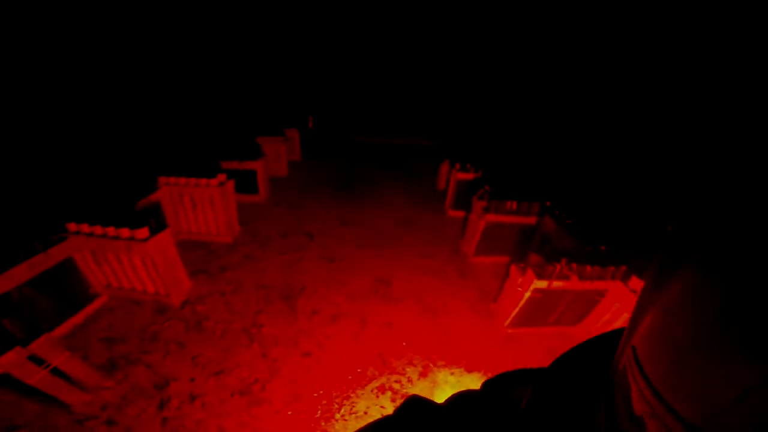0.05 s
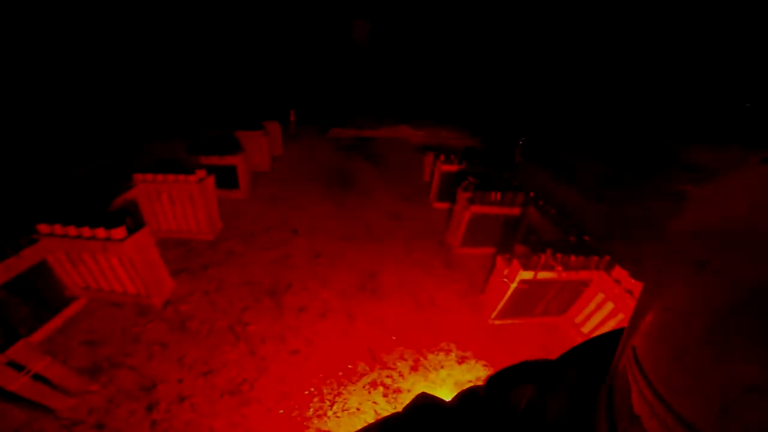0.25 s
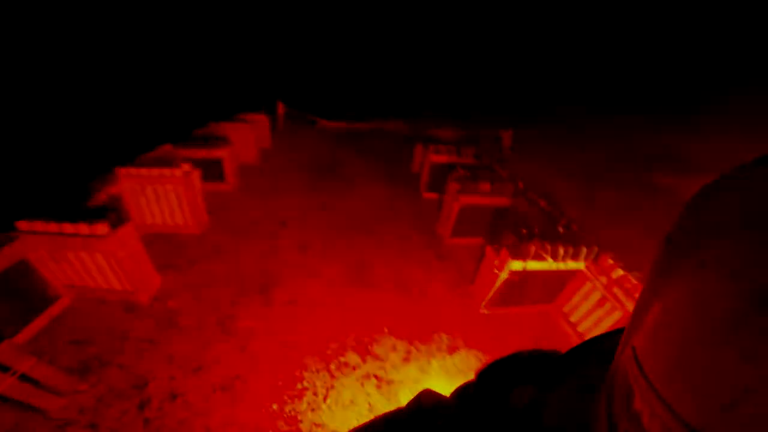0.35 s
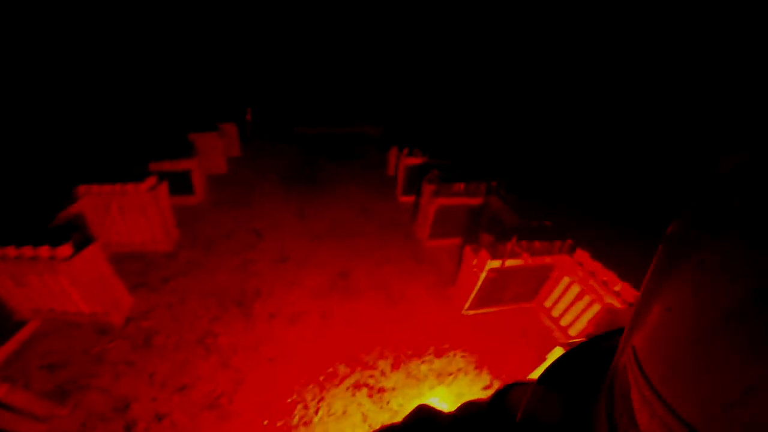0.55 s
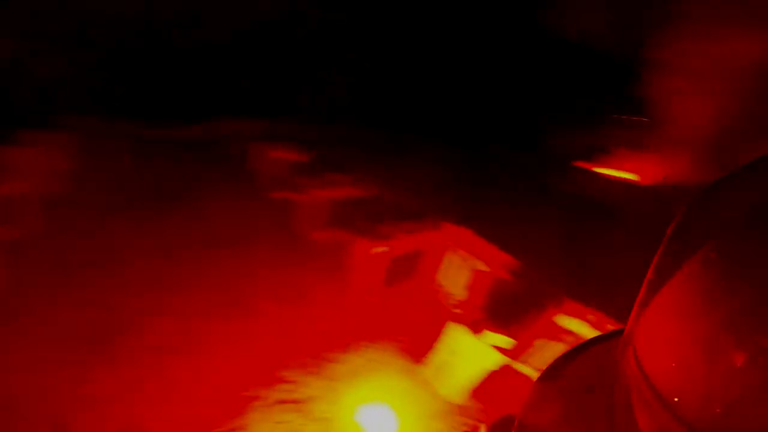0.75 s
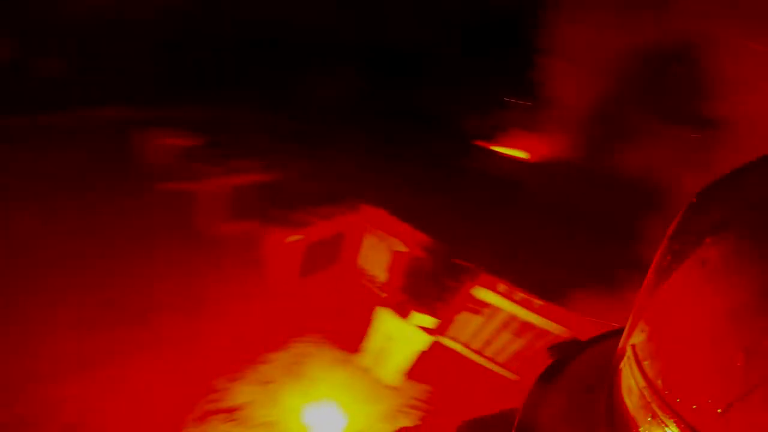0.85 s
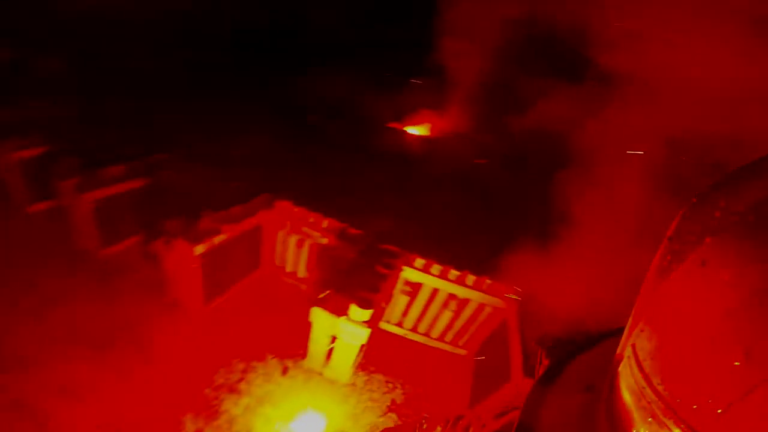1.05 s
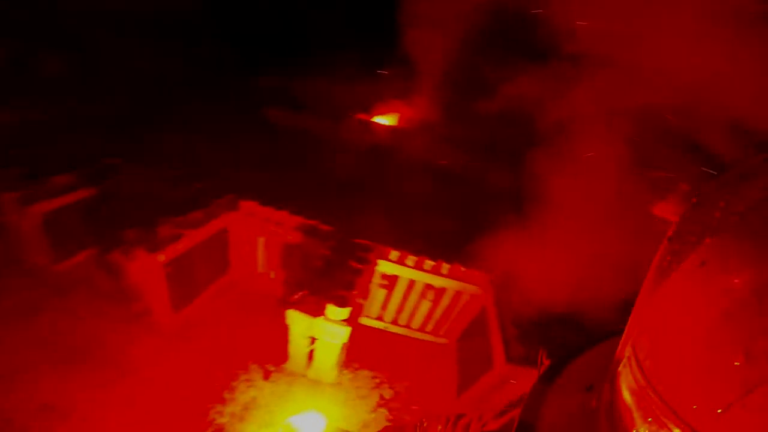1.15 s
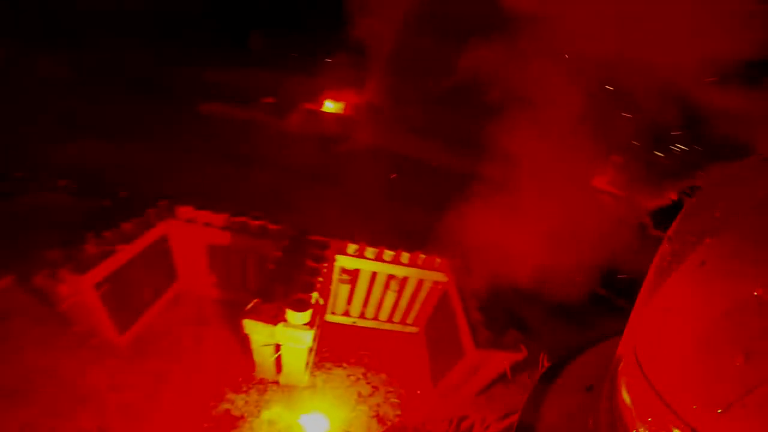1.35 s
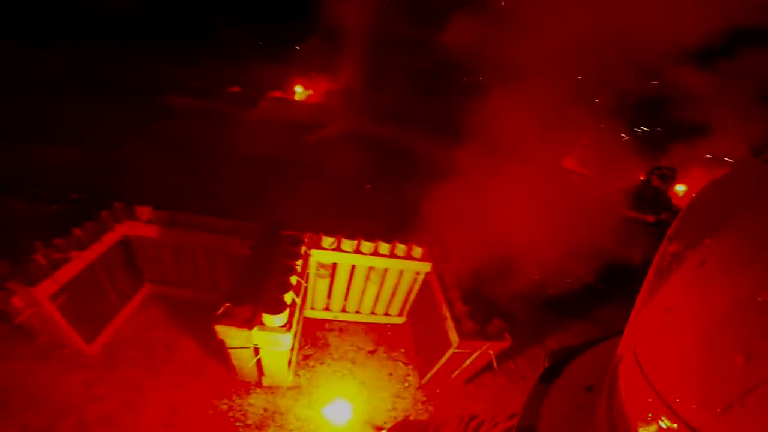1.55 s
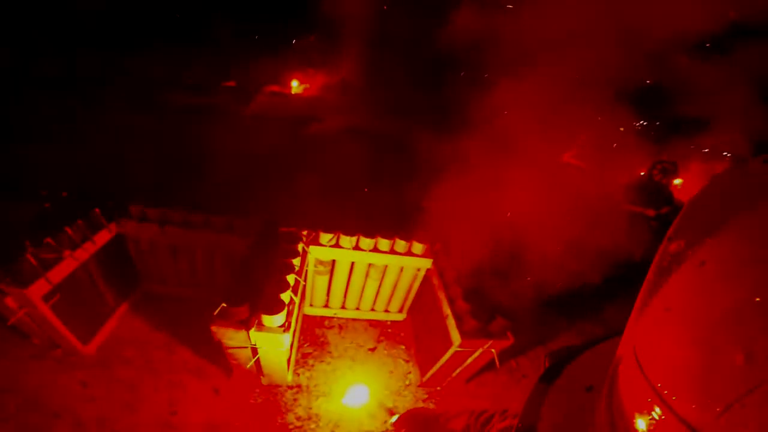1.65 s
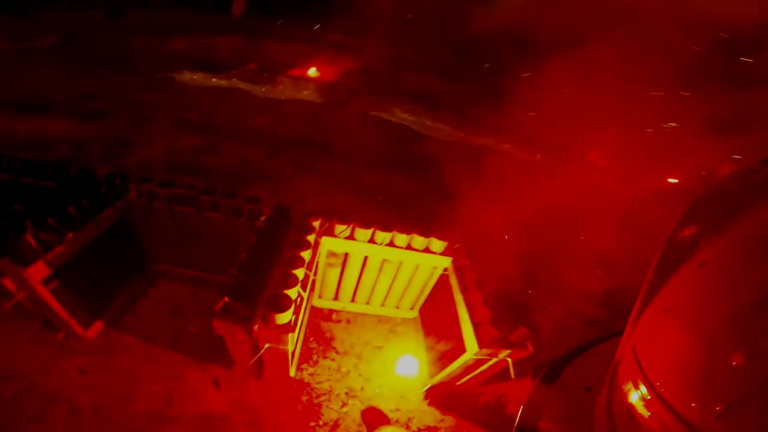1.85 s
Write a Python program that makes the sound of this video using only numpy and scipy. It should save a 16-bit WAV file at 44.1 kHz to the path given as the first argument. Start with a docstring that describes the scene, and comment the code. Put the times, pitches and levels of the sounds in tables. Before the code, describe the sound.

Firework mortar shots outdoors, very close to a microphone in a closed case. Soft far pops at 0.06 and 0.16-0.2 seconds; a dense, clipped volley of cracks and hollow tube thumps at 0.25-0.32; a double bang at 0.48. Muffled distant bangs follow at 0.5-0.63. Echoing roar fades over faint flare hiss, rumble and wind, with a barely audible high squeak at 1.23 and faint far thud at 1.5.

```python
"""A field at night: mortar shells go off, a cluster of near lift charges, a double bang and a few far ones.
Near fronts are pressure pulses with scattered copies, filtered by the closed case around the microphone.
Low pushes ring the mortar tubes, noise bursts make the spray and the far bangs, random taps the echoes.
Shaped noise forms the field's roar, the hiss of a burning flare, rumble and wind; a faint squeak glides up.
The input stage overloads on the loudest peaks."""
import sys
import numpy as np
from scipy import signal
from scipy.io import wavfile
from scipy.ndimage import uniform_filter1d

SR = 44100
rng = np.random.default_rng(int(sys.argv[2]) if len(sys.argv) > 2 else 0)


def gain_from_db(level_db):
    """Turn a decibel level (scalar or array-like) into a linear amplitude factor."""
    decades = np.asarray(level_db, float) / 20
    return 10 ** decades


def int16_out(signal):
    """Quantize to a 16-bit WAV file."""
    q = np.round(np.clip(np.atleast_2d(signal).T, -1, 1) * 32767)
    wavfile.write(sys.argv[1], SR, q.astype(np.int16))


N = 85995

# near blast fronts: start_s, peak_db (of the front behind the case wall), front_length_s,
# scatter_db (before division by 4), scatter_t60_s
NEAR_FRONTS = [(.2435, -42, .0003, 6, .1), (.2475, -30, .0002, 0, .04), (.2490, -2, .00007, -12, .02),
               (.2515, -10, .0002, -2, .06), (.2583, -8, .0001, -8, .04), (.2617, -3, .0002, -8, .03),
               (.2601, -9, .0001, -6, .03), (.2652, -8, .00015, -8, .03), (.2677, -10, .0001, -10, .04),
               (.2745, -14, .0001, 0, .03), (.2762, -4, .0001, -6, .02), (.2797, -11, .0002, -8, .04),
               (.3040, -24, .0004, 4, .06), (.3092, -7, .0006, -10, .03), (.3111, -3, .0002, -10, .03),
               (.3132, -4, .0005, -8, .03), (.3149, -3, .0004, -10, .03), (.3174, -5, .00025, -8, .02),
               (.3186, -7, .0004, -12, .025), (.4832, -9, .0001, -20, .02), (.4836, -4, .00008, -18, .025),
               (.4941, -13, .00012, -14, .025)]
# onsets of the low pushes: start_s
PUSH_STARTS = [.1625, .2485, .2775, .3092, .3157, .4832, .4939]
# low pushes that ring a tube, one row per onset: push_db (before doubling), push_length_s,
# ring_db (before halving), pitch_factor; both parts are low-passed afterwards
PUSHES = [(-56, .002, -32.5, .8), (-44, .001, -18, 1.33), (-54, 0.00081, -11.5, 1.014),
          (-12.5, 0.00051, -21, 1.4), (3, 0.0007, -7, 1.044), (-6.5, 0.00054, -11.5, 1.058),
          (-11.5, 0.00097, -13, .98)]
# mortar tube modes: pitch_hz (before the pitch factor), level_db (before the ring level), t60_s
TUBE_MODES = [(109, -20, 0.174), (206.7, 2, .06), (265, -5, .05), (384, -6, .04)]
# air modes of the case, relative to the direct sound: pitch_hz, level_db, t60_s
CASE_MODES = [(1070, -27.5, 0.017), (1626, -22, .015), (2810, -11, 0.0073), (3673, -23.5, 0.018),
              (4880, -12, 0.0059), (6100, -2.5, 0.0059), (8940, -24, 0.0028)]
# relative transmission through the case wall: frequency_hz, gain_db
CASE_WALL = [(100, -34), (300, -2), (500, -7.5), (1000, -5), (3300, 0), (4000, -5), (6500, -15.5),
             (7500, -17), (10000, 9.5), (13000, -27), (15000, -42), (16500, -87)]
# relative spectrum of the bright spray of burning gas: frequency_hz, gain_db
SPRAY_COLOUR = [(3820, -23), (6500, -2.5), (6800, -8.5), (8090, -13), (8790, -10), (9660, -19),
                (13400, -28), (14600, -26), (16000, -38)]
# decay of the answer from racks and ground: frequency_hz, t60_s
ECHO_DECAY = [(100, 0.37), (400, 0.17), (1500, 0.11), (4000, 0.3), (12000, 0.45)]
# far bangs, smeared by distance: start_s, level_db (before halving), rise_s, t60_s
FAR_BANGS = [(0.0617, -29, 0.00069, 0.031), (0.0644, -34.5, 0.0024, 0.028), (0.164, -30.5, .001, 0.061),
             (0.174, -29.5, 0.0016, 0.092), (0.179, -53, 0.0017, 0.058), (.199, -40, 0.0021, 0.059),
             (0.501, -27, .003, 0.033), (0.512, -29.5, 0.0026, 0.097), (0.545, -29.5, 0.0032, 0.1),
             (.557, -31.5, 0.0023, 0.058), (.630, -38.5, .003, 0.036), (1.497, -45, 0.0059, 0.4)]
# relative spectrum of the far bangs after air and case: frequency_hz, gain_db
FAR_BANG_COLOUR = [(180, -42), (300, 0), (486, -16), (1050, -13), (1280, -9.5), (1570, -2), (2130, -13.5),
                   (2720, -8), (3990, -28.5), (4540, -14), (5170, -23.5), (5970, -15), (6680, -27),
                   (7600, -25), (14000, -52)]
# thin rising squeak: start_s, length_s, from_hz, to_hz
SQUEAK_GLIDE = (1.232, .055, 9900, 10250)
# lingering roar of the field, level of its 1000-3500 Hz band: time_s, level_db
ROAR_LEVEL = [(0.0, -53.5), (0.26, -57), (0.368, -49.5), (0.802, -51.5), (0.966, -54.5), (1.232, -57),
              (1.602, -59.5), (1.786, -60), (1.95, -64.5)]
# relative spectrum of the roar: frequency_hz, gain_db
ROAR_COLOUR = [(180, -52), (300, -12), (364, -16), (407, -2), (448, -11), (478, -8.5), (681, -6),
               (1070, -6.5), (1180, -3.5), (1300, -10.5), (1570, 1), (2170, -10.5), (2590, 2), (3290, -14),
               (4690, -11.5), (5170, -23), (5970, -10), (7970, -32.5), (14000, -41)]
# flare hiss, level of its treble band: time_s, level_db
FLARE_LEVEL = [(0.0, -67.5), (0.286, -87.5), (0.4, -70.5), (0.678, -77), (0.95, -84.5), (1.216, -82),
               (1.492, -75), (1.656, -75), (1.95, -76.5)]
# relative spectrum of the flare: frequency_hz, gain_db
FLARE_SPECTRUM = [(180, -21), (300, 4), (500, -11.5), (543, -11), (610, -3.5), (1140, -11), (1460, -3.5),
                  (1590, -10), (2880, -13.5), (4140, -13), (5390, -19), (13100, -32.5), (15500, -54)]
# treble band to which the flare level refers: low_hz, high_hz
FLARE_TREBLE = (8000, 13000)
# distant low rumble, in two stretches: time_s, level_db
RUMBLE_LEVEL = [
    [(0.0, -51), (0.07, -51.5), (0.112, -56), (0.126, -64), (0.14, -74), (0.15, -53.5)],
    [(0.6, -53.5), (0.686, -52.5), (0.768, -59), (0.802, -50.5), (0.858, -58), (0.934, -52), (0.96, -58.5),
     (1.016, -46.5), (1.058, -58), (1.302, -45.5), (1.324, -49.5), (1.528, -49), (1.558, -53.5),
     (1.84, -56), (1.854, -55), (1.95, -59)],
]
# relative spectrum of the rumble: frequency_hz, gain_db
RUMBLE_SPECTRUM = [(29, -36), (50, -20.5), (76, -3), (160, 0), (258, -7), (328, -21.5), (498, -19),
                   (564, -23), (600, -23), (780, -57), (1320, -120)]
# gusts on the case, in two stretches: time_s, level_db
WIND_LEVEL = [
    [(0.0, -51.5), (0.066, -49), (0.084, -46), (0.164, -44.5), (0.194, -51), (0.224, -53), (0.28, -49)],
    [(0.36, -56), (0.43, -58), (0.466, -64), (0.59, -78), (0.678, -48.5), (0.856, -55), (0.98, -45.5),
     (1.086, -57.5), (1.138, -49.5), (1.204, -53.5), (1.678, -46.5), (1.736, -46.5), (1.762, -43.5),
     (1.922, -44), (1.95, -47)],
]
# relative spectrum of the wind: frequency_hz, gain_db
WIND_SPECTRUM = [(4.7, -35), (8.0, 1), (27, 8), (40, 1.5), (54, -27.5), (90, -7.5), (120, -31), (200, -120)]

SCATTER_RISE_S = .0005  # onset of scattered copies and of the spray


def near_fronts():
    """Scattering: a sharp front is followed by a decaying train of random copies, all behind the case wall."""
    out = np.zeros(N)
    grit = rng.standard_normal((len(NEAR_FRONTS), 8192))
    t = np.arange(8192) / SR
    for (start_s, peak_db, length_s, scatter_db, t60_s), draws in zip(NEAR_FRONTS, grit):
        pulse = front(t, length_s)
        decay = gain_from_db(scatter_db - 60 * t / t60_s) * np.minimum(t / SCATTER_RISE_S, 1)
        scatter = signal.oaconvolve(decay * draws / 4, pulse[:256])[:len(t)]
        front_peak = abs(housing(pulse)).max()
        add(out, start_s, gain_from_db(peak_db) * housing(pulse + scatter) / front_peak)
    return out


def lift_pushes():
    """Resonance: the low push of a lift charge sets the air column of its tube ringing."""
    ring_rise_s, ring_low_cut_hz, dull_hz = 0.00056, 173, 2600
    out, t = np.zeros(N), np.arange(8192) / SR
    low_cut = signal.butter(1, ring_low_cut_hz, "high", fs=SR)
    dulling = signal.butter(2, dull_hz, fs=SR)
    for start_s, (push_db, length_s, ring_db, pitch_factor) in zip(PUSH_STARTS, PUSHES):
        ring = gain_from_db(ring_db) * np.minimum(t / ring_rise_s, 1) * ringing(TUBE_MODES, t, pitch_factor) / 2
        push = gain_from_db(push_db) * 2 * front(t, length_s)
        thump = push - signal.lfilter(*low_cut, ring)
        add(out, start_s, signal.lfilter(*dulling, thump))
    return out


def front(t, length_s):
    """Blast wave: a pressure jump and the suction after it, as the microphone's inverted polarity shows it."""
    u = t / length_s
    return -(1 - u) * np.exp(-u) * np.minimum(u * 4, 1)


def ringing(modes, t, pitch_factor=1):
    """Modal superposition: each mode is an exponentially decaying sine."""
    return sum(gain_from_db(level_db - 60 * t / t60_s) * np.sin(2 * np.pi * pitch_hz * pitch_factor * t)
               for pitch_hz, level_db, t60_s in modes)


def housing(x):
    """Transmission and resonance: the case wall colours the sound and its air modes ring."""
    t = np.arange(2048) / SR
    direct_and_modes = (t == 0) + ringing(CASE_MODES, t)
    inside = signal.oaconvolve(x, direct_and_modes)
    return signal.oaconvolve(inside, causal(CASE_WALL))[:len(x)]


def gas_spray():
    """Turbulent noise: the powers of short bright sprays add, one per front, each with a faint long tail."""
    burst_db, burst_t60_s = -20, 0.0097  # level relative to the front's peak
    tail_db, tail_t60_s = -47.5, 0.32
    power, t = np.zeros(N), np.arange(16384) / SR
    # doubled decibels turn amplitude into power
    decay = gain_from_db(2 * (burst_db - 60 * t / burst_t60_s)) + gain_from_db(2 * (tail_db - 60 * t / tail_t60_s))
    rise = np.minimum(t / SCATTER_RISE_S, 1)
    for start_s, peak_db, *_ in NEAR_FRONTS:
        add(power, start_s, gain_from_db(2 * peak_db) * rise * decay)
    spray = np.sqrt(power) * rng.standard_normal(N)
    return signal.oaconvolve(spray, causal(SPRAY_COLOUR))[:N]


def echoes(x):
    """Reverberation: sparse reflections of random sign, each band dying at its own speed."""
    echo_db = -14.5  # energy of the whole response
    taps = np.zeros(SR // 2)
    slots = np.arange(300, len(taps) - 20, 20)  # one reflection in every 20 samples
    taps[slots + rng.integers(0, 20, len(slots))] = rng.choice([-1., 1.], len(slots))
    hz, t, spectra = signal.stft(taps, SR, nperseg=256)
    decay = gain_from_db(-60 * t / read(ECHO_DECAY, hz)[:, None])
    response = signal.istft(spectra * decay, SR, nperseg=256)[1]
    return gain_from_db(echo_db) * signal.fftconvolve(x, response / np.linalg.norm(response))[:N]


def far_bangs():
    """Propagation loss: a distant charge has no clean front, only a coloured noise burst."""
    out = np.zeros(N)
    grit = rng.standard_normal((len(FAR_BANGS), 8192))
    t = np.arange(8192) / SR
    for (start_s, level_db, rise_s, t60_s), draws in zip(FAR_BANGS, grit):
        body = signal.oaconvolve(draws, causal(FAR_BANG_COLOUR))[:len(t)] / 2
        envelope = gain_from_db(level_db - 60 * t / t60_s) * np.minimum(t / rise_s, 1)
        add(out, start_s, envelope * body)
    return out


def squeak():
    """Frequency glide: the phase of a faint tone is the running sum of its rising frequency."""
    peak_db = -75
    start_s, length_s, from_hz, to_hz = SQUEAK_GLIDE
    t, out = np.arange(0, length_s, 1 / SR), np.zeros(N)
    pitch_hz = from_hz + (to_hz - from_hz) * t / length_s
    tone = np.sin(2 * np.pi * np.cumsum(pitch_hz) / SR)
    add(out, start_s, gain_from_db(peak_db) * tone * np.sin(np.pi * t / length_s) ** .5)
    return out


def field_roar():
    """Diffuse field: the lingering echo of the field is heard as patchy coloured noise."""
    return noise(ROAR_COLOUR, ROAR_LEVEL, patchy_db=2.5, flicker_db=0.7, band=(1000, 3500))


def flare_hiss():
    """Combustion noise: the burning flare is a random hiss whose level is set in its treble."""
    return noise(FLARE_SPECTRUM, FLARE_LEVEL, patchy_db=-0.7, flicker_db=-1.0, band=FLARE_TREBLE)


def low_rumble():
    """Low-pass noise: the distant rumble keeps only low frequencies and wanders in level."""
    return noise(RUMBLE_SPECTRUM, sum(map(list, RUMBLE_LEVEL), []), patchy_db=3.5, flicker_db=-1.8, size=2048)


def wind():
    """Flow noise: gusts on the case are very low random pressure changes."""
    return noise(WIND_SPECTRUM, sum(map(list, WIND_LEVEL), []), patchy_db=0.0, flicker_db=1.5, size=8192)


def noise(colour, curve, patchy_db, flicker_db, size=512, band=(0, 1e9)):
    """Random short-time spectra: patches and a shared flicker vary noise whose band follows a level curve."""
    hop = size // 4
    frames, hz = N // hop + 5, np.fft.rfftfreq(size, 1 / SR)
    real, imaginary, patches = rng.standard_normal((frames, len(hz), 3)).T
    patches = uniform_filter1d(patches, size=6, axis=0)  # along frequency
    patches = evened(uniform_filter1d(patches, size=12, axis=1))  # along time
    flicker = evened(uniform_filter1d(rng.standard_normal(frames), size=5))
    shape = gain_from_db(read(colour, hz))
    in_band = (hz >= band[0]) & (hz < band[1])
    band_share = np.sqrt(np.sum(shape[in_band] ** 2) / np.sum(shape ** 2))
    variation = gain_from_db(patchy_db * patches + flicker_db * flicker)
    spectra = (real + 1j * imaginary) * shape[:, None] * variation
    x = evened(signal.istft(spectra, nperseg=size, noverlap=size - hop)[1][:N]) / band_share
    return x * gain_from_db(np.interp(np.arange(N) / SR, *np.transpose(curve)))


def causal(points, size=4096):
    """Minimum phase: the Hilbert transform of log gain gives a causal impulse response, here of energy 1."""
    gain_db = read(points, abs(np.fft.fftfreq(size, 1 / SR)))
    log_gain = np.log(gain_from_db(np.maximum(gain_db, -100)))
    taps = np.fft.ifft(np.exp(np.conj(signal.hilbert(log_gain)))).real[:size // 2]
    return taps / np.linalg.norm(taps)


def read(points, hz):
    """Logarithmic frequency scale: interpolate a table of values over log frequency."""
    f, value = np.transpose(points)
    return np.interp(np.log(hz + 1), np.log(f + 1), value)


def evened(x):
    """Normalisation: scale to an rms of 1."""
    return x / np.sqrt(np.mean(x ** 2) + 1e-20)


def add(mix, start_s, sound):
    """Linear superposition: add a sound in place from its start time."""
    part = mix[round(start_s * SR):][:len(sound)]
    part += sound[:len(part)]


def scene():
    """Superposition: bangs and their echoes sum with spray, squeak, roar, hiss, rumble and wind."""
    near = near_fronts() + lift_pushes()
    bangs = near + echoes(near) + gas_spray() + far_bangs()
    background = field_roar() + flare_hiss() + low_rumble() + wind()
    return (bangs + squeak() + background)[None]


def top_cut(x):
    """Nothing passes above the cut-off."""
    return signal.sosfilt(signal.butter(12, 16320, fs=SR, output="sos"), x)


def record(dry):
    """Limiting: the excess over the ceiling is low-passed and removed, so loud peaks flatten without harsh treble."""
    ceiling, knee = .97, 30  # full-scale amplitude; a larger knee exponent bends more sharply
    smooth_hz = 7000
    limited = dry / (1 + abs(dry / ceiling) ** knee) ** (1 / knee)
    smoothing = signal.butter(3, smooth_hz, fs=SR, output="sos")
    excess = signal.sosfiltfilt(smoothing, dry - limited)
    mix = dry - excess
    return top_cut(mix)


dry = scene()
out = record(dry)
int16_out(out)
```